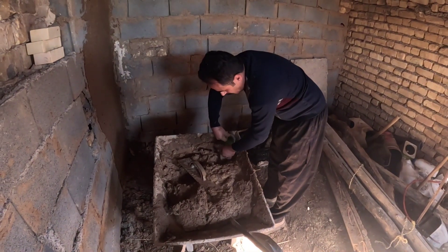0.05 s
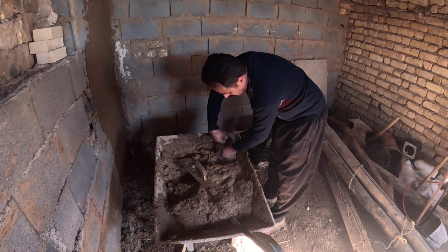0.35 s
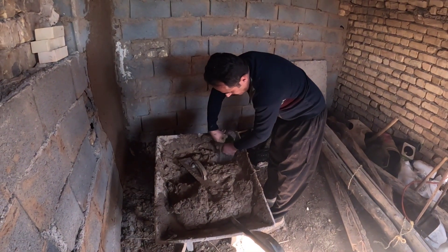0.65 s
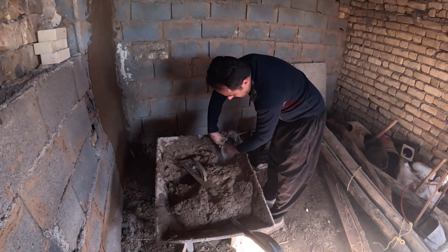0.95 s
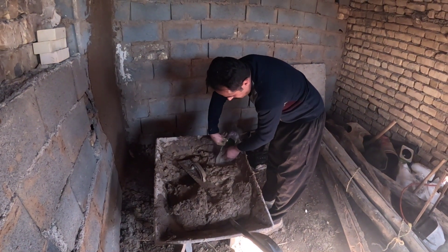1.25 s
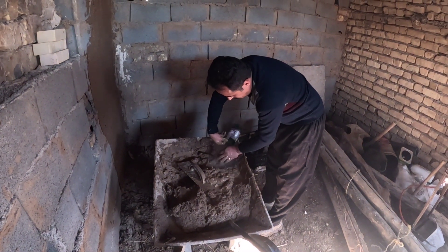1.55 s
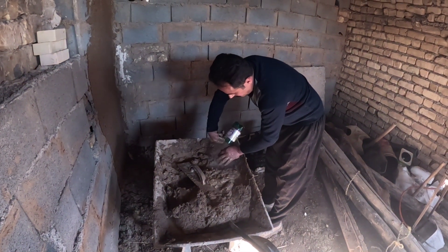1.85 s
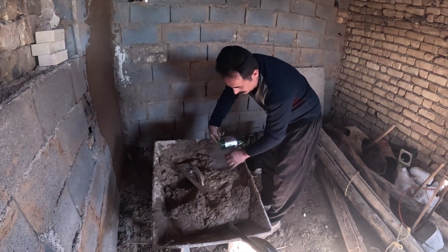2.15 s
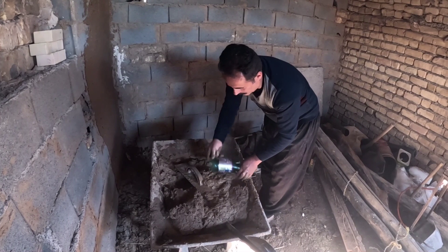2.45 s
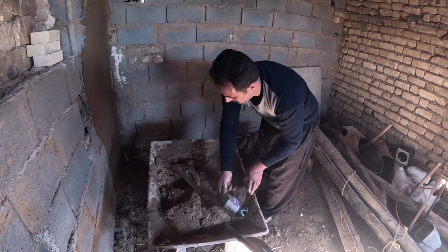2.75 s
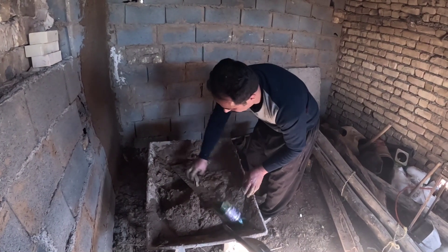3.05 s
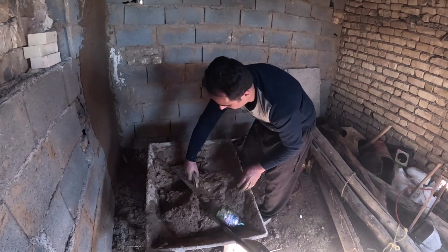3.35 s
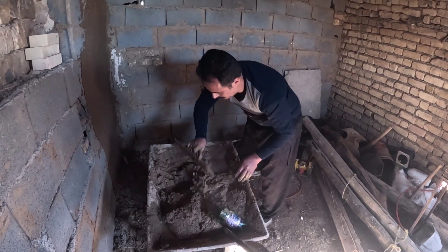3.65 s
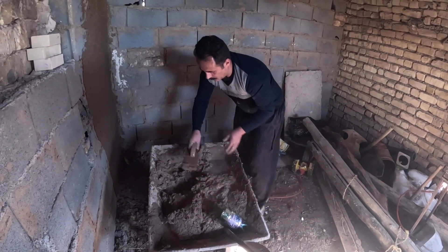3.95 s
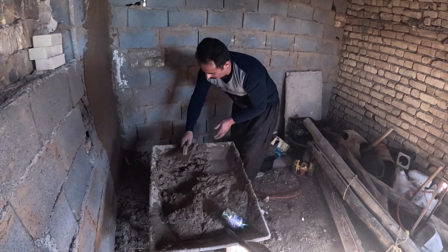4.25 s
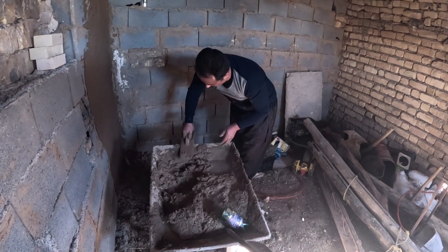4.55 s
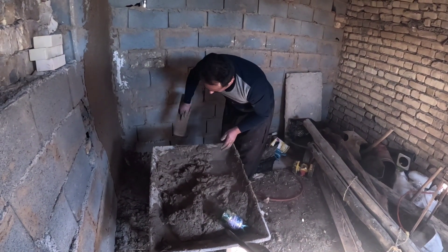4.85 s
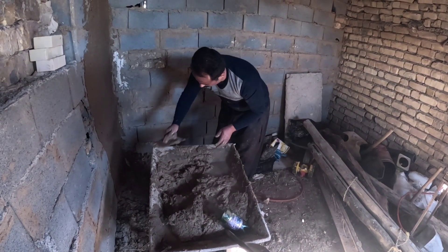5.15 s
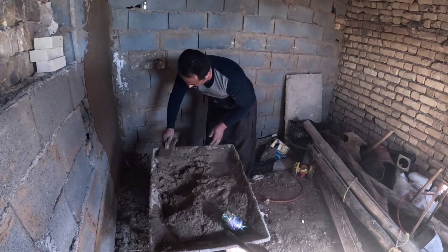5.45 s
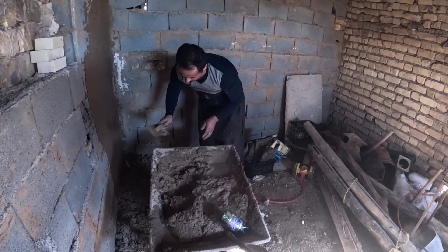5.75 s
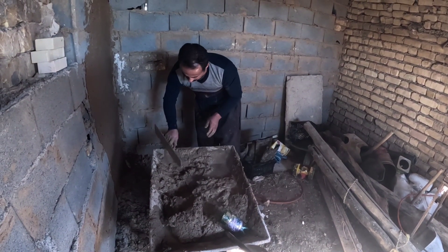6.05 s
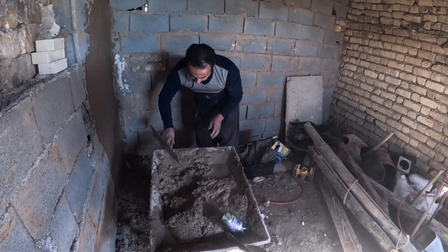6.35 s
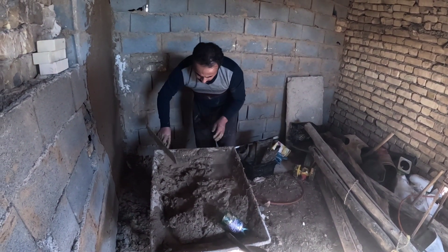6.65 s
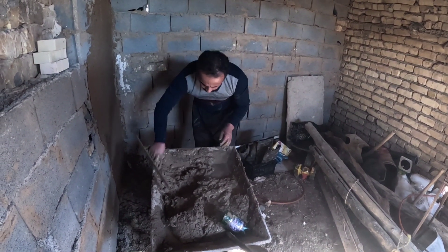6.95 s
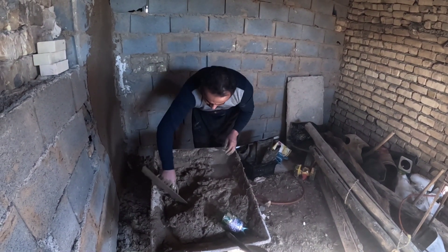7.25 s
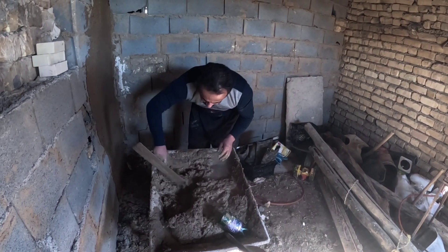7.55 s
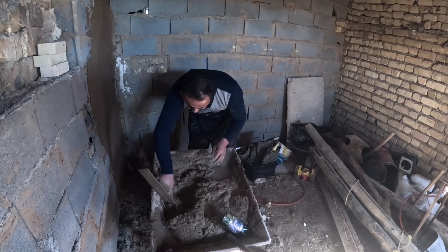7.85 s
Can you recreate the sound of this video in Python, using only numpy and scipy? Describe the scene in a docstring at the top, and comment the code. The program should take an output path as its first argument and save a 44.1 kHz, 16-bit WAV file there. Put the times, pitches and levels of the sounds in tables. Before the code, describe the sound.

A trowel squelches through wet mud in a steel barrow, a can thuds in, then gritty scrapes and three booming knocks follow.

```python
"""A trowel works wet mud plaster in a steel barrow, in a small room with block walls.
The mud squelches as air pockets burst in it. It is scraped off a tin can, and the can drops into
the barrow with a thud and a short note. The trowel rasps twice along the gritty steel, is knocked
three times on the rim so that the pan booms, and slides back into the mud.
Sand grains snap and tick, the walls echo, and a low rumble and hum lie underneath."""
import sys
import numpy as np
from scipy import signal
from scipy.fft import rfft, irfft
from scipy.io import wavfile
from scipy.ndimage import uniform_filter1d, map_coordinates

SR = 44100
rng = np.random.default_rng(int(sys.argv[2]) if len(sys.argv) > 2 else 0)


def master_out(mix):
    """Clip the mix to full scale and print it as 16-bit PCM to the path in sys.argv[1]."""
    frames = np.transpose(np.atleast_2d(mix))
    ceiling = np.clip(frames, -1, 1)
    pcm = np.round(ceiling * 32767).astype(np.int16)
    wavfile.write(sys.argv[1], SR, pcm)


N = 348390
TIME = np.arange(N) / SR
RING_TIME = TIME[:16384]  # time axis of one short sound
MUD_ATTACK_S, MUD_RELEASE_S = 0.018, 0.045  # the blade sinks in; the mud settles behind it

# tones of the blade against the steel: f/Hz, level/dB, t60/s (time to fade by 60 dB)
BLADE_TONES = [(1650, 7, 0.024), (1915, -0.5, 0.022), (3262, -7, 0.043), (5420, -20.5, 0.088),
               (7370, -14.5, 0.07)]
# tones of the barrow's mud-laden pan: f/Hz, level/dB, t60/s
PAN_TONES = [(85.3, -16.5, 0.5), (112, -12, 0.23), (132, -10.5, 0.32), (153.4, -3.5, 0.2), (204.3, 7, 0.13),
             (262, 0, 0.081), (299.7, -6, 0.18), (322, 3, 0.087), (375.3, 5, 0.13), (520.6, -9.5, 0.23),
             (628, -8, 0.11), (736, -22.5, 0.25), (1454, -28, 0.22), (1810, -26, 0.074)]
# spectrum of grit rasping on steel: f/Hz, level/dB
RASP_SPECTRUM = [(500, -23.5), (900, 0.5), (1400, 7), (1900, 1.5), (2600, 0), (3300, -6), (4300, -18.5),
                 (6500, -40.5)]
# spectrum of a thud in the mud: f/Hz, level/dB
THUD_SPECTRUM = [(90, -3.5), (220, 7), (380, 5.5), (650, 6), (850, -3.5), (1400, -28.5), (4000, -27),
                 (15000, -75)]


def mud():
    """The blade rubs through mud, air pockets burst, and the sticky skin tears with a fine crackle."""
    # trowel strokes: start/s, length/s, squelch/dB, sandy hiss/dB, swell/dB, share of bursting/0-1
    strokes = [(0.0, 0.058, -57, -71, -15, 0.97), (0.074, 0.62, -66, -65, -13.5, 0.89),
               (0.356, 0.38, -57, -69.5, 6, 0.99), (0.698, 0.13, -58, -56, 3.5, 0.72),
               (0.876, 0.37, -58, -62.5, -12, 0.89), (1.108, 0.15, -46.5, -54.5, 7, 0.85),
               (1.276, 0.16, -41.5, -52.5, 10.5, 0.39), (1.474, 0.27, -51, -61, 2, 0.73),
               (1.813, 0.13, -49.5, -58.5, 9.5, 0.82), (2.012, 0.31, -78, -67, -2, 0.67),
               (2.352, .12, -71.5, -66, 11, 0.4), (2.528, 0.15, -59.5, -63.5, 7, 0.1),
               (2.802, 0.16, -56, -59.5, -9, 0.37), (3.104, 0.43, -75.5, -72, -10, 0.2),
               (3.49, 0.22, -66, -63.5, 2, 0.86), (3.767, 0.3, -61.5, -61.5, -5, 0.43),
               (4.103, 0.1, -92, -68.5, 7.5, 0.33), (5.697, 0.16, -68.5, -63, -7, 0.1),
               (5.862, .13, -61.5, -59, 3, 0.2), (7.127, 0.093, -55, -56, 15.5, 0.56),
               (7.266, 0.17, -67, -60.5, 4.5, 0.43), (7.452, 0.071, -61.5, -50, 7, 0.56),
               (7.788, 0.14, -51.5, -52, 10, 0.66)]
    # spectra of bursting, smearing and rubbing mud: f/Hz, level/dB
    squelch_spectrum = [(400, 0), (700, -27.5), (1250, 2), (2500, -1), (4800, -3), (7000, -8.5), (10000, 0),
                        (15000, -58)]
    smear_spectrum = [(500, -24), (2500, -13), (5000, -2.5), (7500, -1), (9500, -6.5), (11500, -17.5),
                      (15000, -23)]
    rub_spectrum = [(150, -16), (800, -4.5), (1150, 3), (1900, -5), (3000, -2.5), (4500, -8), (7000, -19),
                    (14000, -49.5)]
    big_pockets = air_pockets(per_s=1050, spread_db=5.2, low_hz=500, high_hz=7500, ring_scale=0.72)
    tiny_pockets = air_pockets(per_s=1700, spread_db=6, low_hz=2200, high_hz=11500, ring_scale=0.6)
    froth = steady(colour(big_pockets, squelch_spectrum), size=2800)
    crackle = unit_rms(colour(steady(tiny_pockets, size=2600), smear_spectrum))
    rub = steady(colour(clicks(per_s=5800, spread_db=3.5), rub_spectrum))
    hiss = unit_rms(colour(clicks(per_s=8000, spread_db=7), smear_spectrum))
    out = np.zeros(N)
    for start, length, squelch_db, sand_db, swell_db, share in strokes:
        bursting, gliding = np.sqrt([share, 1 - share])  # kneaded mud bursts; a gliding blade rubs
        wet = gain_of(squelch_db) * (bursting * froth + gliding * rub)
        sandy = gain_of(sand_db) * (bursting * crackle + gliding * hiss)
        out += (wet + sandy) * stroke(start, length, swell_db, MUD_ATTACK_S, MUD_RELEASE_S)
    return out


def air_pockets(per_s, spread_db, low_hz, high_hz, ring_scale, count=30):
    """Air pockets of many sizes open at random moments, each ringing briefly at its own pitch."""
    openings, kind = clicks(per_s, spread_db), rng.integers(0, count, N)
    ring_lengths = ring_scale * (0.5 + rng.random(count))
    out = np.zeros(N)
    for k, hz in enumerate(np.geomspace(low_hz, high_hz, count)):
        pocket = bubble(hz, cycles=ring_lengths[k] * (hz / low_hz) ** 0.35, rise=0.01)
        out += signal.oaconvolve(openings * (kind == k), pocket)[:N] * hz ** 0.8
    return out


def bubble(hz, cycles, rise):
    """One air pocket rings: loudest after `cycles` swings, while its pitch climbs a little."""
    age = hz * RING_TIME[:1024] / cycles
    bend = 1 + rise * (1 - np.exp(-age))
    return age * np.exp(1 - age) * np.sin(2 * np.pi * np.cumsum(hz * bend) / SR)


def pops():
    """Large pockets tear open and ring, with a wet spit around their own pitch."""
    # the largest air pockets: t/s, level/dB, f/Hz
    pockets = [(0.0943, -42, 4830), (0.236, -40.5, 5080), (0.311, -37, 5160), (0.436, -43, 3350),
               (0.498, -42.5, 2420), (0.5598, -34.5, 2300), (0.625, -37, 1940), (0.663, -42.5, 1650),
               (0.701, -43, 1650), (0.774, -38.5, 2720), (0.9485, -46, 4340), (0.965, -40.5, 2240),
               (0.984, -44, 5660), (0.998, -35.5, 4520), (1.068, -40, 5500), (1.177, -35.5, 2500),
               (1.213, -29.5, 2730), (1.235, -29, 1290), (1.363, -28.5, 2170), (1.4095, -30, 1270),
               (1.4265, -28.5, 1650), (1.688, -38, 1210), (1.866, -39, 2020), (1.945, -32, 4840),
               (3.7839, -37, 3090), (3.897, -43, 2810), (7.83, -34, 3060)]
    ring_s, spit_db = 0.00115, -7
    out = np.zeros(N)
    for s, db, hz in pockets:
        spit_spectrum = [(hz / 7, -28), (hz / 2, -9), (hz, 0), (2 * hz, -9), (16000, -45)]
        add(out, s, gain_of(db) * bubble(hz, cycles=hz * ring_s, rise=0.0089))
        add(out, s, gain_of(db + spit_db) * burst(spit_spectrum, fade_s=0.0069))
    return out


def hollows():
    """The blade opens a hollow in the mud; its note falls as it widens."""
    # hollows behind the blade: start/s, length/s, first f/Hz, last f/Hz, level/dB
    openings = [(7.196, 0.25, 1190, 1030, -68), (7.84, 0.05, 1570, 1050, -53.5)]
    out, grit = np.zeros(N), clicks(per_s=2000, spread_db=4)
    for start, length, from_hz, to_hz, db in openings:
        hz = np.interp(TIME, [start, start + length], [from_hz, to_hz])
        note = unit_rms(resonate(resonate(grit, hz, width_hz=280), hz, width_hz=280))
        out += gain_of(db) * note * stroke(start, length, 0, MUD_ATTACK_S, MUD_RELEASE_S)
    return out


def knocks():
    """Steel on steel: the blade cracks, clanks and sings on, while the pan booms and clatters."""
    # the trowel hits the barrow: t/s, boom/dB, clatter/dB, crack/dB, clank/dB
    blows = [(4.381, -32, -53, -62.5, -62), (5.282, -70, -48.5, -72, -56.5), (5.42, -33, -39, -23.5, -14.5),
             (6.090, -14.5, -11, -9, -17.5), (6.347, -15, -13, -10.5, -23), (6.571, -17, -14, -15.5, -17)]
    # how long the pan's many high tones last: f/Hz, t60/s
    pan_fade = [(100, 0.23), (1800, 0.18), (10000, 0.18)]
    # spectra of the pan's clatter and the blade's crack: f/Hz, level/dB
    clatter_spectrum = [(60, -9.5), (220, 6.5), (400, 0.5), (700, -4.5), (1050, -4.5), (1550, -4.5),
                        (2300, -14.5), (4000, -22.5), (7500, -26.5), (10000, -36.5), (15000, -62.5)]
    crack_spectrum = [(100, -35.5), (700, 12.5), (1200, 6), (1700, 7.5), (2500, 4.5), (4000, -5.5),
                      (7500, -5.5), (10000, -21), (15000, -51)]
    # tones of the blade after it bounces off: f/Hz, level against the crack/dB, t60/s
    free_blade_tones = [(1365, -23, 0.17), (2148, -36, 0.26), (2842, -31.5, 0.27)]
    out = np.zeros(N)
    boom = ring(PAN_TONES) * (1 - np.exp(-RING_TIME / 0.0054))
    clank = unit_peak(ring(BLADE_TONES))
    sheet = fading_noise(pan_fade)
    for s, boom_db, clatter_db, crack_db, clank_db in blows:
        spot = 0.73 * fading_noise(pan_fade)  # each blow lands on a slightly different spot
        clatter = unit_peak(colour(sheet + spot, clatter_spectrum))
        crack = burst(crack_spectrum, fade_s=0.00066) + ring(free_blade_tones)
        add(out, s, gain_of(boom_db) * boom + gain_of(clatter_db) * clatter)
        add(out, s, gain_of(crack_db) * crack + gain_of(clank_db) * clank)
    return out


def scrapes():
    """Sand catches and slips under the blade, making it ring; the coarser grains shake the pan."""
    # pushes over the steel: start/s, length/s, shudder/dB, rasp/dB, fizz/dB, swell/dB
    pushes = [(4.371, 0.091, -50.5, -52, -53.5, 15), (4.469, 0.069, -36, -31.5, -38, 6.5),
              (4.567, 0.054, -38, -25.5, -27, 3.5), (4.636, 0.17, -36, -37, -39, -4),
              (5.409, 0.072, -42.5, -30.5, -36, 10.5), (5.497, 0.08, -39, -33.5, -36.5, 3),
              (5.585, 0.055, -40, -34, -37.5, 5.5), (5.641, 0.054, -44, -42.5, -48.5, 8)]
    # the blade's two resonances move as it tilts: t/s, lower f/Hz, upper f/Hz
    tilt = [(4.489, 1380, 2150), (4.61, 1530, 2610), (4.72, 1440, 2474), (4.81, 1600, 2560),
            (5.43, 1550, 1880), (5.476, 1820, 2210), (5.52, 1650, 3150), (5.629, 2110, 3250)]
    # spectra of the shuddering pan and the fizzing sand: f/Hz, level/dB
    shudder_spectrum = [(70, -27.5), (140, 4), (220, 8.5), (350, 7.5), (750, 9.5), (950, -2), (1400, -41)]
    fizz_spectrum = [(2000, -42.5), (3500, 0.5), (4300, 4.5), (6200, 2.5), (7400, 1), (8700, -2),
                     (10000, -10), (12000, -17), (15000, -34)]
    coarse = clicks(per_s=1300, spread_db=4)
    grit = coarse + 0.72 * clicks(per_s=9700, spread_db=2.5)
    times, lower_hz, upper_hz = np.transpose(tilt)
    lower = unit_rms(resonate(grit, np.interp(TIME, times, lower_hz), width_hz=280))
    upper = unit_rms(resonate(grit, np.interp(TIME, times, upper_hz), width_hz=500))
    blade = flexing_steel(grit, BLADE_TONES)
    pan = flexing_steel(coarse, PAN_TONES)
    shudder = steady(unit_rms(colour(coarse, shudder_spectrum)) + 0.7 * pan)
    rasp = steady(colour(unit_rms(grit) + 0.25 * lower + 0.5 * upper, RASP_SPECTRUM))
    fizz = steady(colour(unit_rms(grit) + 1.7 * blade, fizz_spectrum))
    chatter = unit_rms(gain_of(1.7 * wander(per_s=130)))  # the blade catches and slips
    out = np.zeros(N)
    for start, length, shudder_db, rasp_db, fizz_db, swell_db in pushes:
        sound = gain_of(shudder_db) * shudder + gain_of(rasp_db) * rasp + gain_of(fizz_db) * fizz
        out += sound * stroke(start, length, swell_db, attack_s=0.018, release_s=0.02)
    return chatter * out


def flexing_steel(grit, tones, drift_s=0.0012):
    """Grit rings the pressed steel; as it flexes, the ring runs early or late and wavers in pitch."""
    ringing = signal.oaconvolve(grit, ring(tones))[:N]
    bent_time = TIME + drift_s * wander(per_s=30)
    return unit_rms(map_coordinates(ringing, [bent_time * SR], mode="mirror"))


def can():
    """The hollow can ticks, thuds into the mud and gives a short, damped note."""
    # the can bumps and settles: t/s, note/dB, thud/dB, tick/dB
    hits = [(2.583, -52, -51, -61), (2.661, -33.5, -39.5, -25.5), (2.953, -37.5, -68, -28),
            (3.183, -28, -22.5, -34), (3.229, -53, -38, -42), (3.321, -53, -49.5, -61)]
    # tones of the can: f/Hz, level/dB, t60/s
    tones = [(514.3, 4.5, 0.12), (540, 11, 0.024), (707, -18, 0.16), (815, -4.5, 0.048),
             (1258, -16.5, 0.13), (1410, -16, 0.079)]
    tick_spectrum = [(300, -6), (1400, 11.5), (2200, 2.5), (3100, 10), (5000, -4), (9000, -15),
                     (15000, -68)]
    out = np.zeros(N)
    note = ring(tones) * (1 - np.exp(-RING_TIME / 0.002))
    for s, note_db, thud_db, tick_db in hits:
        add(out, s, gain_of(note_db) * note + gain_of(thud_db) * burst(THUD_SPECTRUM, fade_s=0.011))
        add(out, s, gain_of(tick_db) * burst(tick_spectrum, fade_s=0.0033))
    return out


def bumps():
    """The blade jams on coarse grit and jerks free; set down in the mud, it gives a soft pat."""
    # catches on grit and pats on mud: t/s, peak/dB
    catches = [(4.488, -26), (4.516, -21), (4.723, -22)]
    pats = [(3.686, -49.5), (7.764, -49.5)]
    out = np.zeros(N)
    for s, db in catches:
        add(out, s, gain_of(db) * burst(RASP_SPECTRUM, fade_s=0.003))
    for s, db in pats:
        add(out, s, gain_of(db) * burst(THUD_SPECTRUM, fade_s=0.0079))
    return out


def sand():
    """Single grains snap sharply and crumble; tiny crumbs tick all the while."""
    # grains snap under the blade or the can: t/s, peak/dB
    snaps = [(0.781, -32), (0.8888, -26), (0.9486, -29.5), (1.125, -31), (1.2087, -24.5), (1.439, -26),
             (2.8199, -30.5), (2.86, -30.5), (2.9502, -23.5), (3.185, -35.5), (3.694, -34.5),
             (3.795, -23.5), (4.093, -35), (4.382, -30), (4.5314, -21.5), (4.582, -17.5), (4.812, -24),
             (5.4187, -18), (5.739, -35), (6.142, -36), (6.627, -40.5), (7.15, -38), (7.484, -40),
             (7.83, -25.5)]
    # spectrum of breaking sand: f/Hz, level/dB
    spectrum = [(200, -8), (1200, -17.5), (5000, 4), (7500, 4), (9500, -4), (15000, -34)]
    crumbs_db, crumble_db = -51, -8
    out = gain_of(crumbs_db) * unit_peak(colour(clicks(per_s=25, spread_db=3), spectrum))
    for s, db in snaps:
        add(out, s, gain_of(db) * burst(spectrum, fade_s=0.0005))
        add(out, s, gain_of(db + crumble_db) * burst(spectrum, fade_s=0.003))
    return out


def scuffs_and_swell():
    """Faint short scuffs between the knocks, then a soft airy swell near 1.4 and 3.3 kHz."""
    # the scuffs and the swell: start/s, length/s, level/dB
    events = [(6.264, 0.013, -65), (6.3, 0.024, -59), (6.54, 0.022, -63.5), (6.903, 0.1, -72),
              (7.017, 0.041, -64)]
    # their spectrum: f/Hz, level/dB
    spectrum = [(600, -31.5), (1400, 1.5), (2700, -10.5), (3330, 0), (3900, -13.5), (9000, -35.5)]
    noise = unit_rms(colour(clicks(per_s=2000, spread_db=-2.5), spectrum))
    return noise * sum(gain_of(db) * stroke(start, length, 0, attack_s=0.0063, release_s=0.014)
                       for start, length, db in events)


def echoes(x, fade_s, count=3, places_per_s=2.6):
    """Echoes off the near walls and the barrow; their pattern shifts as the hands move."""
    # how long the room rings, before fade_s shortens it: f/Hz, t60/s
    room_fade = [(150, 0.26), (1000, 0.11), (4000, 0.088), (12000, 0.05)]
    out = np.zeros(N)
    for k in range(count):
        tail = fading_noise(room_fade) * np.exp(-RING_TIME / fade_s) * (1 - np.exp(-RING_TIME / 0.0012))
        place = np.sqrt(2 / count) * np.cos(np.pi * (places_per_s * TIME + k / count))
        out += signal.oaconvolve(x * place, tail / np.linalg.norm(tail))[:N]
    return out


def air(level_db=-46.5):
    """A low rumble under a faint hiss, as mid (shared by both ears) and side (left against right)."""
    # spectrum of the background: f/Hz, relative level/dB
    spectrum = [(10, -6), (45, -7), (65, -18), (85, -8.5), (100, -15), (140, -24.5), (400, -41.5),
                (800, -52), (1400, -44.5), (3500, -66), (6000, -53.5), (9500, -58), (15000, -83.5)]
    # its stereo width: f/Hz, side against mid/dB
    width = [(30, -14), (80, -18.5), (300, -5.5), (1000, -2), (10000, -7.5)]
    hz = np.fft.rfftfreq(N, 1 / SR)
    bands = rfft(rng.standard_normal((2, N))) * gain_of(look_up(spectrum, hz))
    bands[1] *= gain_of(look_up(width, hz))
    mid_side = irfft(bands, N)
    return gain_of(level_db) * mid_side / mid_side[0].std()


def hum(hz=58):
    """A low hum that swells and fades at random."""
    # overall course of the hum: t/s, level/dB
    levels = [(0, -44.5), (1.3, -47), (1.9, -58), (2.45, -44), (7.9, -44.5)]
    swell = 0.7 + wander(per_s=9) + 1j * wander(per_s=9)  # both strength and phase drift
    tone = (swell / np.sqrt(2 + abs(swell) ** 2) * np.exp(2j * np.pi * hz * TIME)).real
    return gain_of(np.interp(TIME, *np.transpose(levels))) * unit_rms(tone)


def stroke(start, length, swell_db, attack_s, release_s):
    """Loudness of one stretch of sound: it rises, changes by swell_db over its length, and dies away."""
    age = TIME - start
    attack = np.clip(age / attack_s, 0, 1)
    progress = np.clip(age / length, 0, 1)
    release = np.exp(-np.maximum(age - length, 0) / release_s)
    return attack * gain_of(swell_db * (progress - 0.5)) * release


def ring(tones):
    """Dying tones; neighbours swing opposite ways, so the sound swells as the blow spreads."""
    return sum((-1) ** k * gain_of(db) * np.exp(-np.log(1000) * RING_TIME / t60)
               * np.sin(2 * np.pi * hz * RING_TIME) for k, (hz, db, t60) in enumerate(tones))


def resonate(x, hz, width_hz):
    """A resonance that follows the pitch curve hz."""
    turn = np.exp(2j * np.pi * np.cumsum(hz) / SR)
    decay = np.exp(-np.pi * width_hz / SR)
    return 2 * (turn * signal.lfilter([1 - decay], [1, -decay], x / turn + 1e-18)).real


def fading_noise(t60s):
    """Noise in which each band dies at its own speed."""
    hz, t, bands = signal.stft(rng.standard_normal(len(RING_TIME)), SR, nperseg=256)
    fade = np.exp(-np.log(1000) * t / look_up(t60s, hz)[:, None])
    return signal.istft(bands * fade, SR, nperseg=256)[1][:len(RING_TIME)]


def burst(spectrum, fade_s):
    """A brief crunch of contact that builds and dies, peak 1."""
    age = RING_TIME / fade_s
    crunch = rng.choice([-1., 1.], len(age)) * np.sqrt(age) * np.exp(-age)
    return unit_peak(colour(crunch, spectrum))


def clicks(per_s, spread_db):
    """Random clicks; spread_db sets how much their sizes vary."""
    out, chance = np.zeros(N), rng.random(N)
    hit = chance < per_s / SR
    size = np.minimum(-np.log(chance[hit] * SR / per_s), 4)
    out[hit] = gain_of(spread_db * size) * rng.choice([-1., 1.], N)[hit]
    return out


def wander(per_s):
    """A smooth random drift of average level 1."""
    times = np.arange(0, N / SR + 1, 1 / per_s)
    zigzag = np.interp(TIME, times, rng.standard_normal(N)[:len(times)])
    return unit_rms(uniform_filter1d(zigzag, size=int(SR / per_s / 2)))


def steady(x, size=3500):
    """Holds the running level of a stream of grains near 1 and keeps the single grains."""
    power = uniform_filter1d(uniform_filter1d(x ** 2, size), size)
    return x / np.sqrt(abs(power) + 1e-3 * np.mean(x ** 2))


def colour(x, spectrum, size=4096):
    """Filters by a spectrum (f/Hz, level/dB) so that clicks keep their sharp front."""
    log_gain = np.log(gain_of(look_up(spectrum, abs(np.fft.fftfreq(size, 1 / SR)))))
    taps = np.fft.ifft(np.exp(np.conj(signal.hilbert(log_gain)))).real[:size // 2]
    return signal.oaconvolve(x, taps)[:len(x)]


def look_up(points, hz):
    """Reads a table on a log-frequency axis."""
    f, value = np.transpose(points)
    return np.interp(np.log(hz + 1), np.log(f + 1), value)


def add(mix, s, sound):
    """Adds a sound at time s."""
    part = mix[max(round(s * SR), 0):][:len(sound)]
    part += sound[:len(part)]


def gain_of(db):
    """Decibels to gain."""
    return 10 ** (np.asarray(db) / 20)


def unit_rms(x):
    """Scales to an average level (rms) of 1."""
    return x / np.sqrt(np.mean(x ** 2) + 1e-20)


def unit_peak(x):
    """Scales to peak 1."""
    return x / abs(x).max()


def scene():
    """All the work is straight ahead; the room's echoes spread it sideways, the bass least."""
    # stereo width of the echoes: f/Hz, side against mid/dB
    width = [(150, -39.5), (350, -17.5), (600, -13), (2500, -8.5), (9000, -9.5), (13000, 0.5)]
    direct = mud() + hollows() + pops() + sand() + can() + scrapes() + bumps() + knocks()
    direct += scuffs_and_swell()
    mid_echo = colour(echoes(direct, fade_s=0.25), [(200, -24), (600, -5), (1500, -10.5), (9000, -7)])
    side_echo = colour(echoes(direct, fade_s=0.025), width)
    lean = colour(direct, [(300, -32.5), (2500, -21)])  # the treble leans a little to the left
    mid, side = np.array([direct + mid_echo, side_echo + lean]) + air()
    return np.array([mid + side, mid - side]) + hum()


def record(dry):
    """Cuts away the highest treble, above 15300 Hz."""
    low_pass = signal.firwin(255, 15300, window=("kaiser", 9), fs=SR)
    return signal.oaconvolve(dry, low_pass[None], "same")


dry = scene()
out = record(dry)
master_out(out)
```